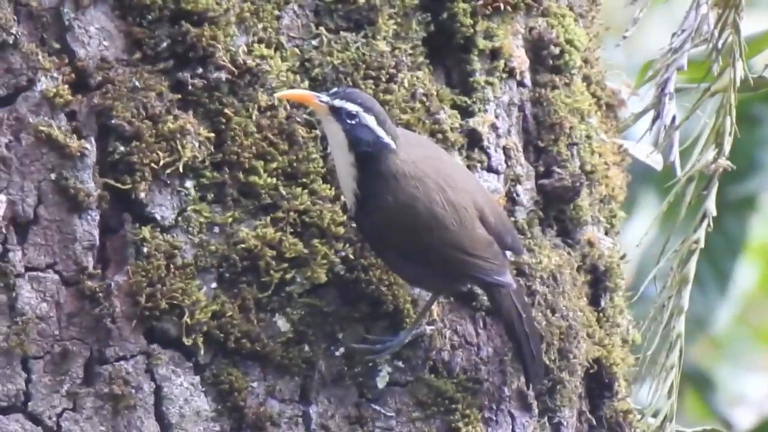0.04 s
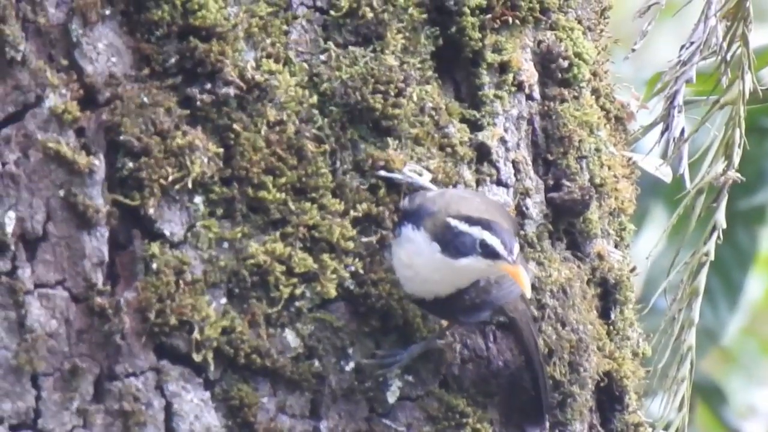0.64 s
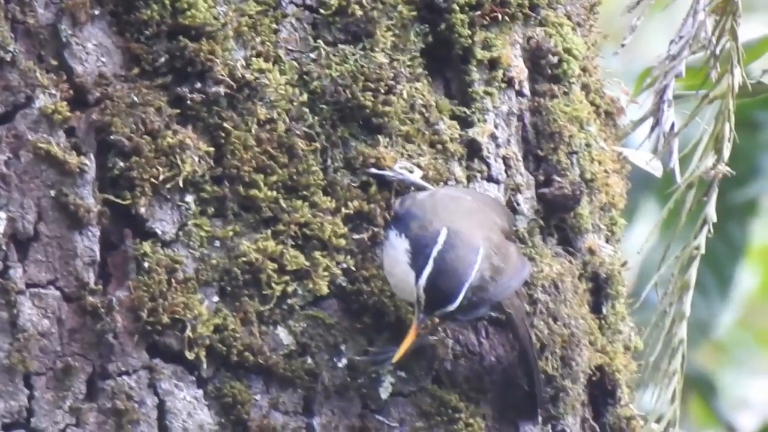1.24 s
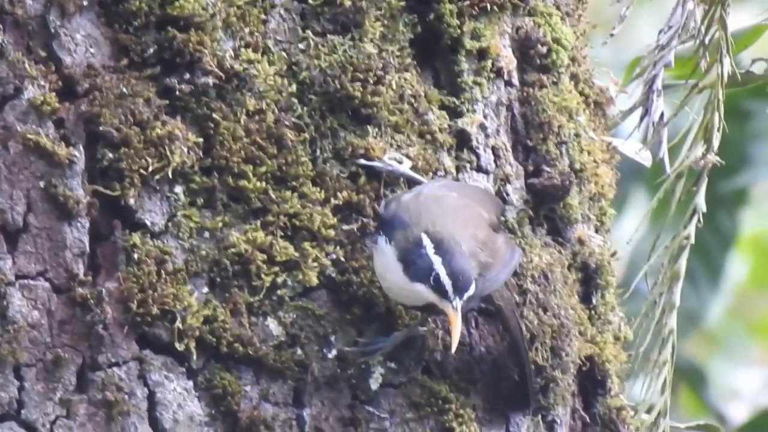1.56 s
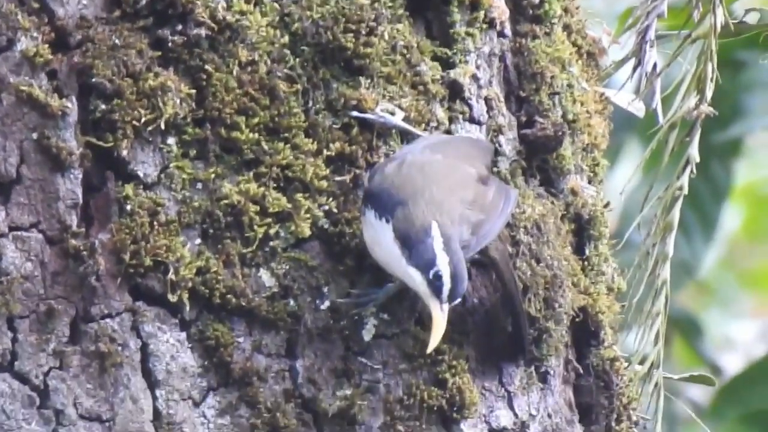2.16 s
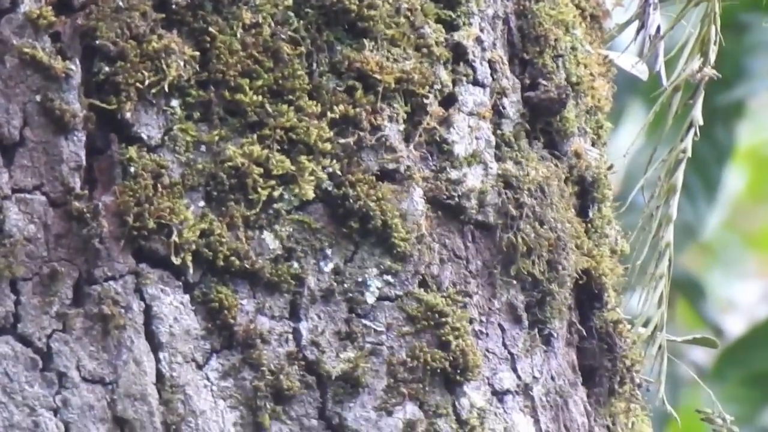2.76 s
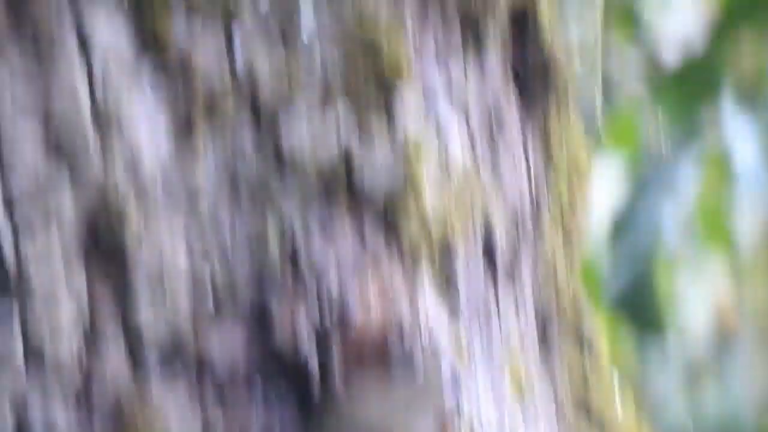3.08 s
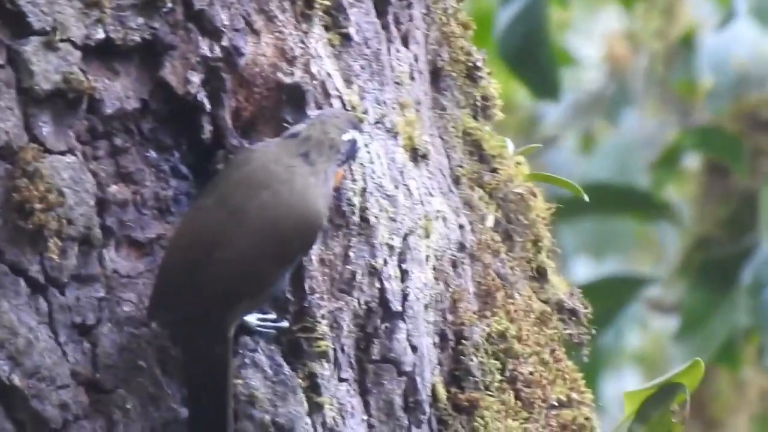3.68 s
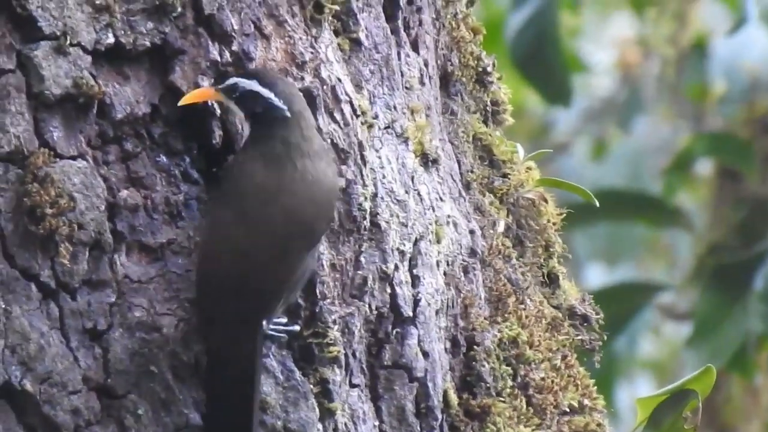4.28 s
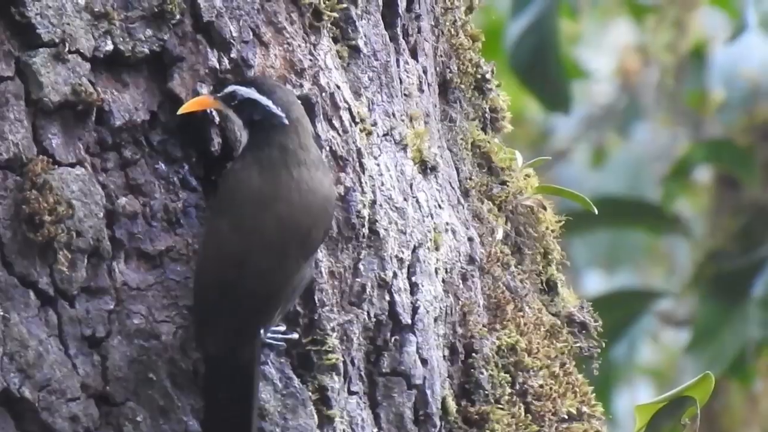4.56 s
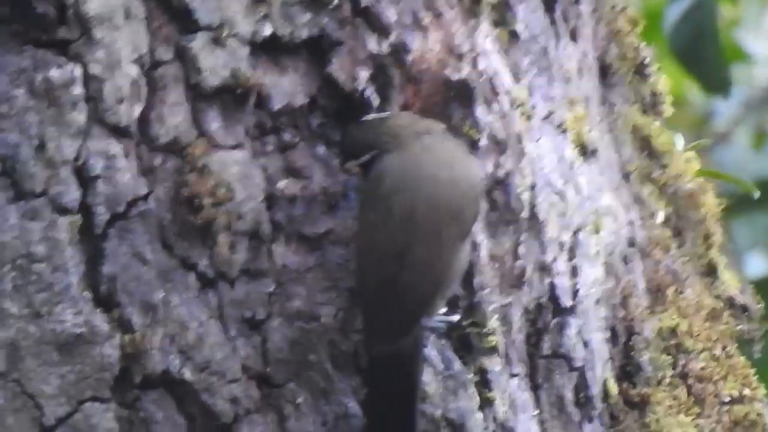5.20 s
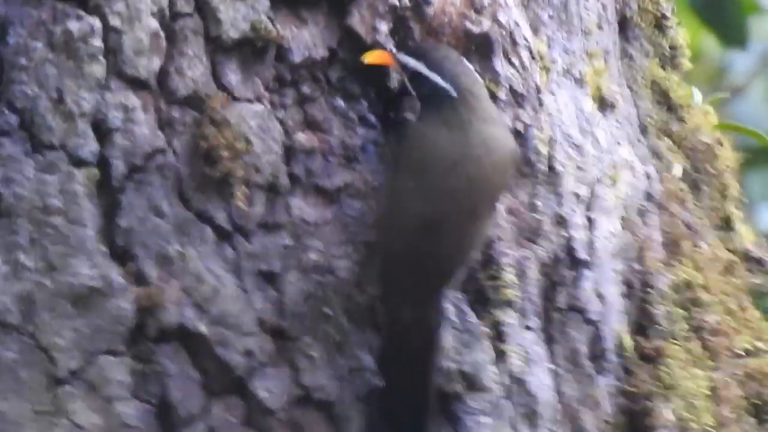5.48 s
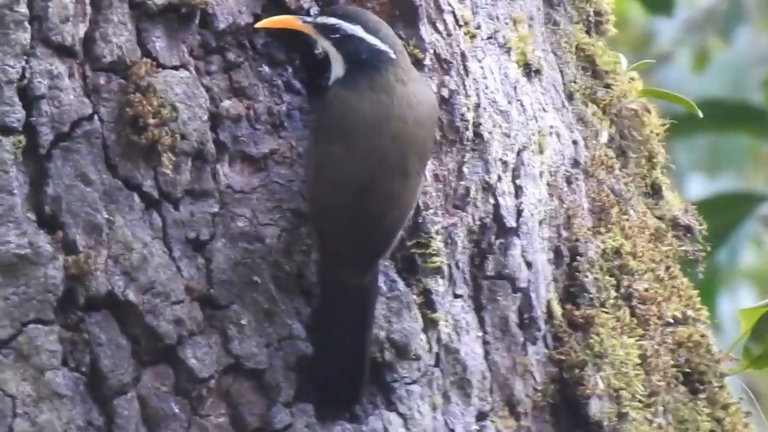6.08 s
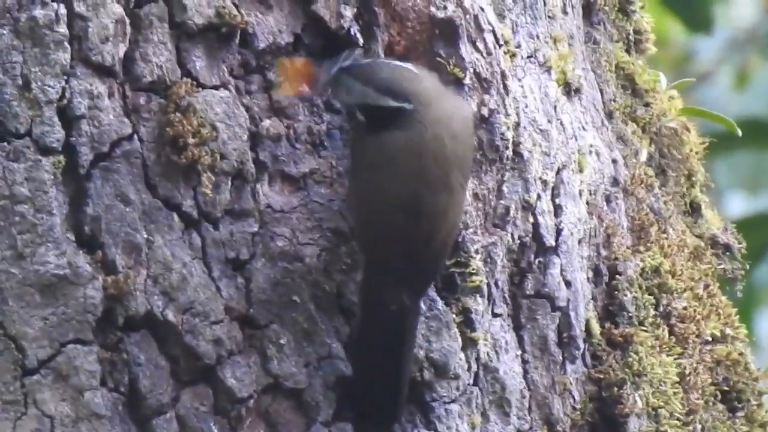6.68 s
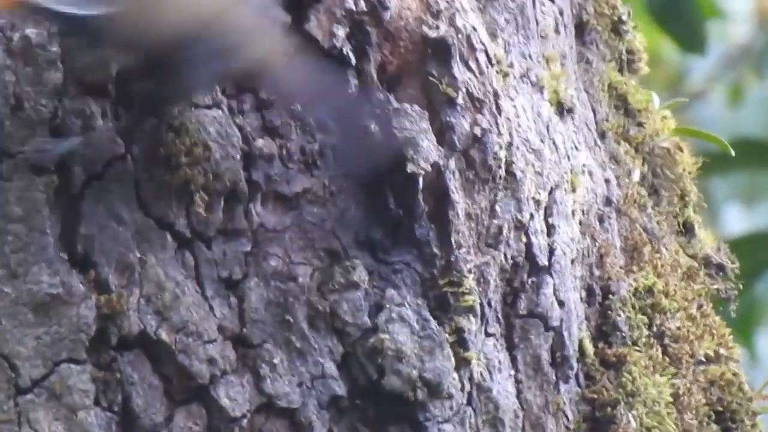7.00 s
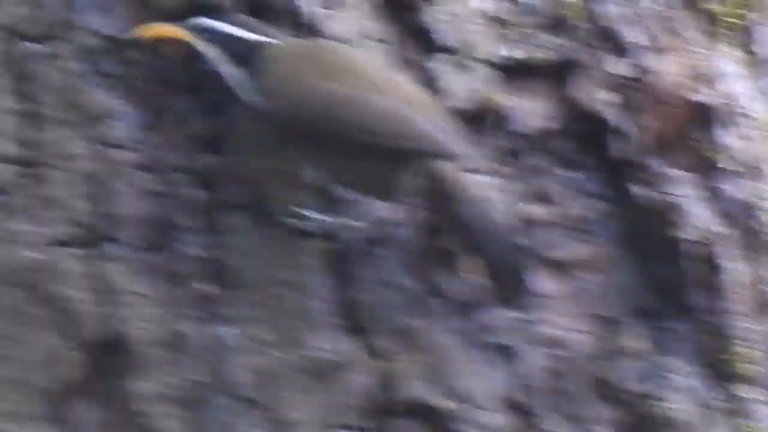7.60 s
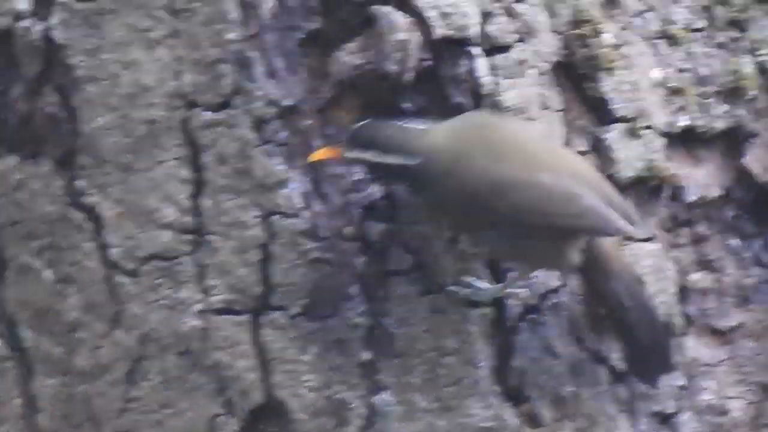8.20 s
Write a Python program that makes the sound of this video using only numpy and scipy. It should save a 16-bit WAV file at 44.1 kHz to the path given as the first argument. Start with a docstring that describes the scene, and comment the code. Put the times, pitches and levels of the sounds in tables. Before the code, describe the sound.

Forest birds chirp and call in overlapping notes, with sharp chips close by and slurred whistles further off, above soft background noise.

```python
"""A still forest on a stereo microphone, with a steady low hush and a blur of far birds throughout.
Slurred whistles and a thin trill start at middle distance, over a faint rumble that fades. Two near
birds trade sharp, arched chips that ring on among the trunks. A row of soft pips follows, and long
falling calls carry from deep in the trees. Later come a few dry ticks, one low rising call and, in
the second half, three whip-like notes close by."""
import sys
import numpy as np
from scipy import signal
from scipy.fft import rfft, irfft, next_fast_len
from scipy.io import wavfile

SR = 44100
rng = np.random.default_rng(int(sys.argv[2]) if len(sys.argv) > 2 else 0)


def pcm_store(signal):
    """Save signal as 16-bit PCM."""
    levels = np.round(np.clip(np.atleast_2d(signal), -1, 1) * 32767)
    wavfile.write(sys.argv[1], SR, levels.astype(np.int16).T)


N = 372644
TIME = np.arange(N) / SR

# sharp chips near the microphone: time_s, level_db, bird
CHIPS = [(.3231, -24.5, "left"), (.7068, -24, "left"), (.8918, -25, "left"), (.9536, -22, "left"),
         (1.5266, -20.5, "left"), (2.4682, -22.5, "left"), (3.782, -24.5, "left"), (4.6739, -23.5, "left"),
         (4.742, -25, "left"), (4.8407, -21, "left"), (5.2305, -33.5, "right"), (5.302, -31.5, "right"),
         (5.3786, -30.5, "right"), (5.4568, -31.5, "right"), (5.5795, -31, "right"), (5.8872, -38, "right"),
         (6.0797, -35, "right"), (6.1696, -32, "right"), (6.4814, -33.5, "right"), (6.7611, -33, "right"),
         (7.2139, -26, "left"), (7.2829, -24.5, "left"), (7.3612, -22.5, "right"), (7.462, -22.5, "left"),
         (7.591, -26, "left"), (7.8893, -24, "left"), (8.1074, -26, "left"), (8.2804, -24.5, "right")]
# the two chipping birds, by label: resting_top_hz, left_minus_right_db
CHIPPERS = {"left": (6140, -4), "right": (6300, 1.7)}


def from_db(db):
    """Decibels to gain."""
    return 10 ** (np.asarray(db) / 20)


def add(out, start_s, sound):
    """Mix a sound into a track from a given time on."""
    at = round(start_s * SR)
    first, last = max(at, 0), min(at + sound.shape[-1], N)
    if last > first:
        out[..., first:last] += sound[..., first - at:last - at]


def tone(hz):
    """A sine that follows a pitch curve."""
    return np.sin(2 * np.pi * np.cumsum(hz) / SR)


def wobble(size, per_s):
    """A random drift of spread about 1, gliding to a new value per_s times a second."""
    knots = rng.standard_normal(int(size / SR * 1000) + 2)
    return np.interp(np.arange(size) / SR * per_s, np.arange(len(knots)), knots)


def stereo_noise(size, likeness):
    """White noise; likeness is the correlation between the channels."""
    mid, side = rng.standard_normal((2, size))
    alike = np.clip(likeness, 0, 1)
    return np.sqrt((1 + alike) / 2) * mid + np.sqrt((1 - alike) / 2) * side * np.array([[1], [-1]])


def coloured(spectrum, likeness, humps=()):
    """Stereo noise of rms 1 with a given spectrum."""
    size = next_fast_len(N, True)
    hz = np.maximum(np.fft.rfftfreq(size, 1 / SR), 1)
    points = np.array(spectrum)
    level_db = np.interp(np.log(hz), np.log(points[:, 0]), points[:, 1])
    for centre, width, hump_db in humps:
        level_db = level_db + hump_db / (1 + (2 * (hz - centre) / width) ** 2)
    noise = irfft(rfft(stereo_noise(size, likeness)) * from_db(level_db), size)[:, :N]
    return noise / noise.std()


def forest(sound, wet_db, early_t60, late_t60, late_db, likeness, build_s=0.003):
    """Scatter from leaves and trunks: a quick near decay and a longer far one."""
    t = np.arange(SR) / SR
    decay = from_db(-60 * t / early_t60) + from_db(late_db - 60 * t / late_t60)
    decay *= 1 - np.exp(-t / build_s)
    response = stereo_noise(SR, likeness) * decay / np.sqrt(np.sum(decay ** 2))
    return from_db(wet_db) * signal.fftconvolve(sound[None], response, axes=1)[:, :N]


def slur(length_s, first_hz, middle_hz, last_hz, level_db, waver, edge, burr=0, buzz_hz=0, fade_db=0):
    """A note bent through three pitches; edge is the share spent on each ramp, burr roughens the end."""
    u = np.linspace(0, 1, max(round(length_s * SR), 10))
    hz = np.polyval(np.polyfit([0, .5, 1], [first_hz, middle_hz, last_hz], 2), u)
    buzz = buzz_hz * tone(250 * (1 + 0.106 * wobble(len(u), 56)))  # the syrinx flutters near 250 Hz
    swell = np.sin(np.pi / 2 * np.clip(np.minimum(u, 1 - u) / edge, 0, 1))
    roughness = 1 + burr * u * wobble(len(u), 650)
    wavering_hz = hz * (1 + waver * wobble(len(u), 249.5))
    return from_db(level_db + fade_db * u ** 2) * swell * roughness * tone(wavering_hz + buzz)


def slurs(rows, **manner):
    """A track of slurred notes, each row led by its start time."""
    out = np.zeros(N)
    for start, *note in rows:
        add(out, start, slur(*note, **manner))
    return out


def hush(sway_db=0.9):
    """The low hush of the forest all round the microphone, swaying slightly in level."""
    # spectrum of the hush: frequency_hz, relative_db
    spectrum = [(25, -17), (60, -18.5), (95, -14), (135, -1), (220, 2), (320, -0.5), (620, -4), (1300, -4),
                (2400, -8.5), (5000, -10.5), (8500, -14.5), (15500, -27.5)]
    # humps on that spectrum: centre_hz, width_hz, boost_db
    humps = [(756, 53, 4), (1031, 170, 6), (1850, 37, 5.5)]
    # its slow swell: time_s, level_db
    swell = [(0, -54.5), (.5, -53), (.92, -53), (1.3, -53.5), (2.3, -53), (2.7, -52), (3.2, -54.5),
             (3.6, -53.5), (8.45, -53.5)]
    level_db = np.interp(TIME, *np.transpose(swell)) + sway_db * wobble(N, 6.4)
    return from_db(level_db) * coloured(spectrum, likeness=0.35, humps=humps)


def far_chorus(level_db=-53, flutter_db=.8):
    """Many far birds blur into a band of high noise."""
    # spectrum of the blur: frequency_hz, relative_db
    spectrum = [(2700, -28), (3200, -7), (3700, -8.5), (4400, -9.5), (5500, -11.5), (6300, 1), (6800, -2.5),
                (7400, -10), (8400, -40)]
    return from_db(level_db + flutter_db * wobble(N, 16)) * coloured(spectrum, likeness=0.2)


def rumble():
    """A faint low rumble, strongest in the first second."""
    # spectrum of the rumble: frequency_hz, relative_db
    spectrum = [(25, -25), (55, 5), (75, 4), (110, -8), (200, -27)]
    # its rise and fade: time_s, level_db
    swell = [(0, -75), (.5, -68), (.7, -83), (4, -79), (5, -93)]
    return from_db(np.interp(TIME, *np.transpose(swell))) * coloured(spectrum, likeness=0.25)


def far_birds(whistle_db=-55, twitter_db=-51, count=44):
    """Whistles and high twitters at random, too far off to arrive as anything but scatter."""
    notes = []
    for when, pitch, length, faintness in rng.random((count, 4)):
        start, hz = when * TIME[-1], 3550 + 650 * pitch
        notes.append((start, .05 + .1 * length, hz, .94 * hz, .86 * hz, whistle_db - 6 * faintness))
    for when, pitch, length, faintness in rng.random((2 * count, 4)):
        start, hz = when * TIME[-1], 6300 + 1100 * pitch
        notes.append((start, 0.03 + 0.026 * length, hz, hz, 0.79 * hz, twitter_db - 6 * faintness))
    song = slurs(notes, waver=0.007, edge=0.18)
    return forest(song, wet_db=0, early_t60=.3, late_t60=.9, late_db=-20, likeness=.6)


def falling_calls(bend_hz=(6320, 5880, 4392), level_db=-32.5, direct_db=-11):
    """Calls from deep in the trees reach the microphone mostly as scatter, each by its own paths."""
    # long falling calls: start_s, length_s
    falls = [(-.13, 0.15), (1.61, 0.12), (2.495, 0.08), (3.983, 0.14), (5.494, .133), (6.561, 0.18),
             (7.526, 0.14)]
    out = np.zeros((2, N))
    for start, length in falls:
        call = slur(length, *bend_hz, level_db, waver=0.0131, edge=0.18, fade_db=-1.5)
        add(out, start, from_db(direct_db) * call)
        add(out, start, forest(call, wet_db=-1.9, early_t60=0.58, late_t60=1.44, late_db=-15,
                               likeness=0.31, build_s=0.01))
    return out


def whistle_notes(straight_fall_hz=580, bow_turn_hz=70, bow_share=.15, rise_hz=238, drop_hz=90):
    """Falling and hooked whistles as notes that bend through three pitches."""
    # falling whistles: start_s, length_s, start_hz, fall_hz, level_db
    falling = [(0.104, 0.063, 3710, 420, -50.5), (0.488, .16, 3826, 622, -52), (0.5, 0.094, 3190, 463, -53),
               (0.818, 0.11, 3726, 598, -42), (1.16, .14, 3910, 170, -56), (1.322, 0.25, 3907, 641, -33.5),
               (2.605, 0.089, 3926, 691, -46), (2.842, 0.08, 3550, 450, -47.5),
               (3.235, 0.13, 3774, 626, -42.5), (3.342, 0.11, 4310, 633, -50),
               (3.608, 0.18, 3880, 210, -54.5), (3.789, 0.062, 3620, 444, -56),
               (4.298, 0.23, 3894, 512.2, -38.5), (4.502, 0.1, 3940, 263, -48), (4.596, .1, 3696, 478, -45),
               (4.742, 0.22, 3920, 633, -44.5), (4.921, .11, 3546, 428, -55), (5.024, .12, 3740, 448, -44),
               (5.228, .187, 4426, 692, -39), (5.529, 0.16, 4180, 328, -46), (5.66, 0.11, 3850, 743, -57),
               (6.052, .295, 3815, 442.5, -35), (6.385, 0.087, 4150, 758, -41),
               (6.684, 0.17, 3870, 150, -51), (6.828, 0.25, 3820, 380.3, -40.5),
               (7.269, 0.18, 3393, 247, -42.5), (7.55, 0.036, 3780, 357, -45),
               (7.626, 0.14, 3920, 200, -49), (7.658, 0.099, 3650, 349.9, -54),
               (7.773, 0.049, 3716, 598, -44), (8.034, 0.19, 4396, 671, -36),
               (8.285, 0.13, 3710, 651, -53.5)]
    # hooked whistles that rise and tip over: start_s, length_s, top_hz, level_db
    hooked = [(3.014, .06, 3800, -51), (3.126, 0.049, 3580, -43.5), (4.58, 0.087, 3875, -42.5),
              (5.151, 0.0921, 3940, -48), (5.77, 0.045, 3550, -42), (6.417, 0.13, 3940, -37.5),
              (6.545, 0.1, 4220, -37), (7.822, 0.05, 3566, -38.5), (7.948, 0.032, 3800, -45)]
    notes = []
    for start, length, hz, fall, db in falling:
        # shallow falls drop late, deep ones early
        bow_hz = bow_share * fall * np.tanh((straight_fall_hz - fall) / bow_turn_hz)
        notes.append((start, length, hz, hz - fall / 2 + bow_hz, hz - fall, db))
    for start, length, hz, db in hooked:
        notes.append((start, length, hz - rise_hz, hz, hz - drop_hz, db))
    return notes


def whistlers(near_db=-36, direct_slope=1.02, scatter_db=-39, scatter_slope=0.52):
    """Birds at middle distance: loud whistles are near and pure, faint ones are mostly echo."""
    notes = whistle_notes()
    direct_notes = [(*note, near_db + direct_slope * (db - near_db)) for *note, db in notes]
    direct = slurs(direct_notes, waver=.005, edge=.18, burr=.35, buzz_hz=55, fade_db=-1)
    add(direct, .042, from_db(-14) * direct)  # reflection from one trunk
    # scattered sound falls off more slowly with distance than direct sound does
    scattered_notes = [(*note, scatter_db + scatter_slope * (db - near_db)) for *note, db in notes]
    scattered = slurs(scattered_notes, waver=0.0161, edge=0.088, burr=0.29, buzz_hz=95, fade_db=-3.5)
    echoes = forest(scattered, wet_db=-3, early_t60=.28, late_t60=.9, late_db=-26,
                    likeness=.82, build_s=.03)
    return direct * from_db([[-.5], [.5]]) + echoes


def trills(length_s=.12, strokes_per_s=55, sweep_hz=520, climb_hz=297):
    """Each trill is a run of tiny downstrokes that climbs and swells."""
    # thin trills some way off: start_s, pitch_hz, level_db
    runs = [(.25, 6650, -47), (.4, 6376, -44), (.71, 6500, -43), (1.125, 6480, -42.5), (1.31, 6220, -41),
            (1.75, 6130, -40), (1.985, 6500, -41), (2.22, 6200, -40), (2.38, 6200, -40), (2.95, 6450, -48),
            (3.41, 6370, -39.5), (3.89, 6400, -38), (4.32, 6470, -39.5), (5.83, 6200, -40),
            (6.28, 6120, -42)]
    song, u = np.zeros(N), np.linspace(0, 1, round(length_s * SR))
    stroke = (u * length_s * strokes_per_s) % 1
    pulses = np.sin(np.pi * stroke) ** 4
    swell = np.sqrt(np.abs(np.sin(np.pi * u ** 1.2)))
    for start, pitch_hz, level_db in runs:
        hz = pitch_hz + climb_hz * u + sweep_hz * (1 - 2 * stroke)
        add(song, start, from_db(level_db) * swell * pulses * tone(hz))
    return song + forest(song, wet_db=-5.5, early_t60=0.37, late_t60=0.82, late_db=-14, likeness=0.14)


def chip_pitch(time_s, bird, excited_hz=342, calm_s=0.1596):
    """Every chip excites its bird, so the top pitch climbs in a quick run and settles in a pause."""
    excitement = sum(np.exp((earlier - time_s) / calm_s)
                     for earlier, _, who in CHIPS if who == bird and earlier < time_s)
    return CHIPPERS[bird][0] + excited_hz * excitement


def chips(lead_s_per_db=1e-5, waver=0.018, rasp_db=-36, stretch_spread=0.12):
    """Two near birds flick a whistle up to its top pitch, with a rasp, a squeak and a low afternote."""
    # the quick upstroke: from_peak_s, pitch_ratio, relative_db
    upstroke = [(-.009, 0.43, -34), (-.0055, .77, -8), (-.003, .92, 2.5), (0, 1.0, 11), (.002, 1.02, -0.5),
                (.0045, 1.0, 5.5), (.007, 0.88, -61)]
    # the soft low note after it: from_peak_s, pitch_ratio, relative_db
    afternote = [(.005, .58, -26.5), (.009, .68, -18.5), (.012, .73, -5), (.015, .70, -20),
                 (.019, .64, -45)]
    # a faint squeak from the other side of the syrinx: from_peak_s, pitch_ratio, relative_db
    squeak = [(-.012, 0.97, -13), (-.008, 1.23, -18.5), (-.005, 1.36, -33), (.001, 1.12, -11.5),
              (.005, 1.2, -40), (.009, 1.5, -58)]
    out, t = np.zeros((2, N)), np.arange(-SR // 70, SR // 40) / SR
    rasp_band = signal.butter(2, [6600, 10500], "band", fs=SR, output="sos")
    for time_s, level_db, bird in CHIPS:
        top_hz, voice = chip_pitch(time_s, bird), 0
        side_db = CHIPPERS[bird][1] / 2 * np.array([[1], [-1]])
        direct_db = min(0, 0.4 * (level_db + 19))  # faint chips are further off: less direct sound
        stretch = np.exp(stretch_spread * rng.uniform(-1.12, 1))  # no two chips last equally long
        for shape in upstroke, afternote, squeak:
            when, ratio, shape_db = np.transpose(shape)
            hz = top_hz * np.interp(t, when * stretch, ratio) * (1 + waver * wobble(len(t), 960))
            swell = from_db(level_db + np.interp(t, when * stretch, shape_db, left=-120, right=-120))
            rasp = from_db(rasp_db) * signal.sosfilt(rasp_band, rng.standard_normal(len(t)))
            # the chip reaches the louder side of the microphone first
            phase = 2 * np.pi * (np.cumsum(hz) / SR + hz * side_db * lead_s_per_db)
            add(out, time_s + t[0], swell * from_db(side_db + direct_db) * (np.sin(phase) + rasp))
            # lower pitches are beamed less and absorbed less, so more comes back from the trees
            voice = voice + swell * (top_hz / hz) * (tone(hz) + rasp)
        # the birds hop about, so every chip is scattered along other paths
        echoes = forest(voice, wet_db=-2, early_t60=0.54, late_t60=1.9, late_db=-37, likeness=0.29)
        add(out, time_s + t[0], echoes)
    return out


def pips(count=9, first_s=1.041, gap_s=.130, slowing_s=.0027, hz=2685, length_s=.022, echo_s=0.0511):
    """Soft pips on one pitch, slowing and swelling, each with a faint echo and a smooth tail."""
    k = np.arange(count)
    centres_s = first_s + gap_s * k + slowing_s * k * (k - 1) / 2
    levels_db = np.linspace(-50, -42.5, count)
    notes = [(s - length_s / 2, length_s, hz, hz, hz, db) for s, db in zip(centres_s, levels_db)]
    song = slurs(notes, waver=.011, edge=.45)
    add(song, echo_s, from_db(-13) * song)
    return song + forest(song, wet_db=0, early_t60=.6, late_t60=1.1, late_db=-18, likeness=.8)


def ticks():
    """Small hard contacts, like claws on bark, that die at once."""
    # dry ticks: start_s, level_db
    contacts = [(2.556, -44), (5.924, -35.5), (5.949, -40.5), (6.275, -44)]
    # what a tick rings with: pitch_hz, relative_db, t60_s
    modes = [(1100, -14, .012), (3300, 0, .014), (5600, -4, .006), (8500, -13, .004)]
    out, t = np.zeros(N), np.arange(SR // 30) / SR
    for start, level_db in contacts:
        for hz, mode_db, t60 in modes:
            add(out, start, from_db(level_db + mode_db - 60 * t / t60) * np.sin(2 * np.pi * hz * t))
    return out


def near_calls(whip_s=0.035, whip_hz=(7230, 6090, 2640)):
    """Close to the microphone, one whistle slides softly up and three whip steeply down."""
    # the low rising call: start_s, length_s, start_hz, middle_hz, end_hz, level_db
    rises = [(3.718, 0.04, 1520, 1946, 2360, -53.5)]
    # whip-like downstrokes: start_s, level_db
    whips = [(5.124, -30.5), (7.11, -35), (8.197, -37)]
    whip_notes = [(start, whip_s, *whip_hz, db) for start, db in whips]
    song = slurs(whip_notes, waver=0.018, edge=0.28, fade_db=-6) + slurs(rises, waver=0.04, edge=0.14)
    return song + forest(song, wet_db=0, early_t60=0.32, late_t60=1.0, late_db=-9, likeness=.5)


def scene():
    """Birds near and far over the hush of the forest."""
    birds = chips() + whistlers() + near_calls() + falling_calls() + trills() + pips() + far_birds()
    return birds + ticks() + hush() + far_chorus() + rumble()


def record(dry, cutoff_hz=15750):
    """The highest treble is cut steeply."""
    return signal.sosfilt(signal.ellip(12, .1, 70, cutoff_hz, fs=SR, output="sos"), dry)


dry = scene()
out = record(dry)
pcm_store(out)
```